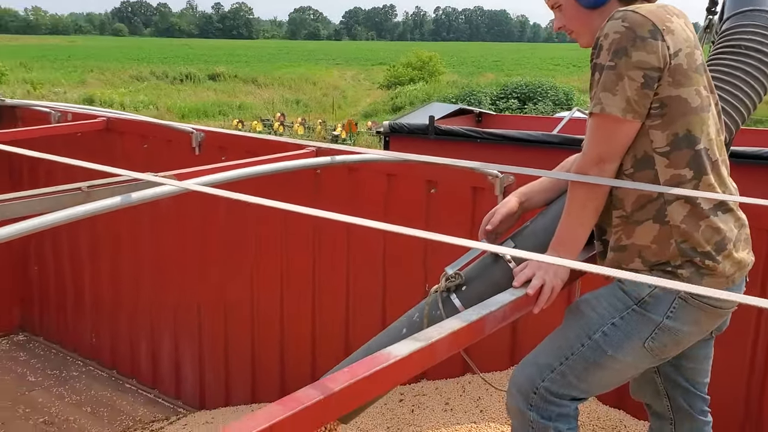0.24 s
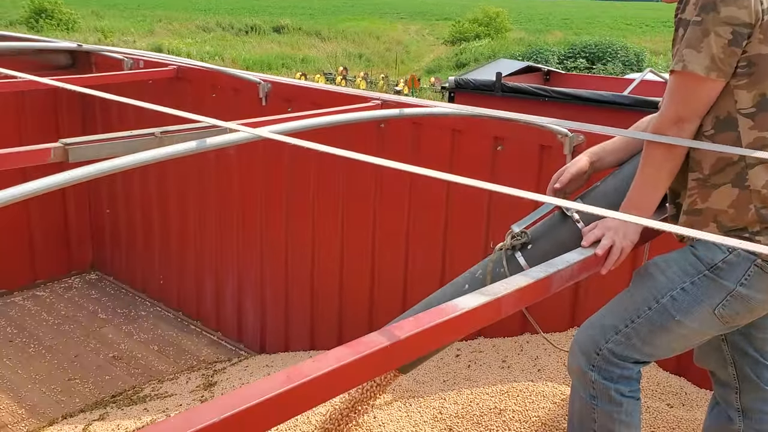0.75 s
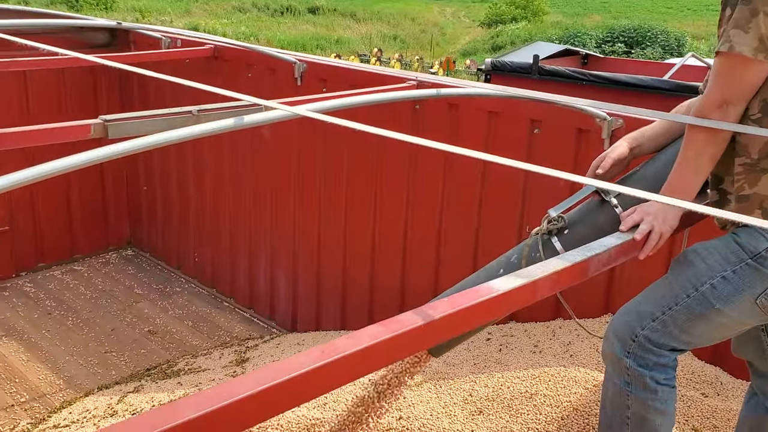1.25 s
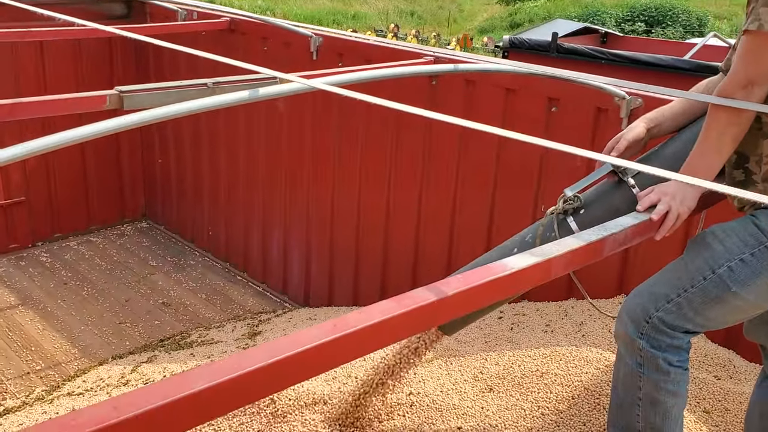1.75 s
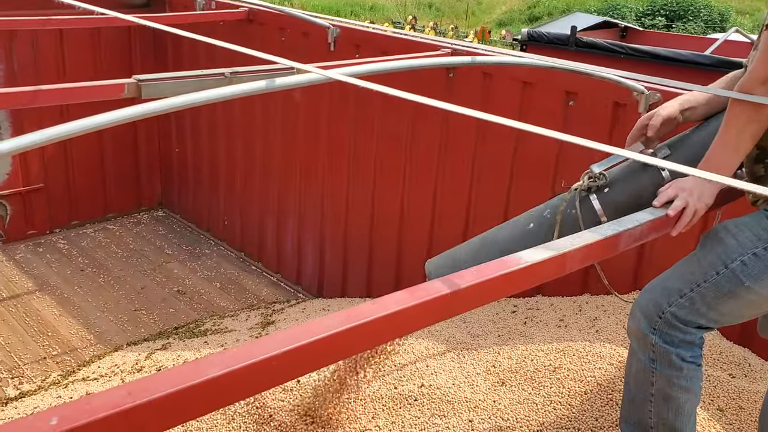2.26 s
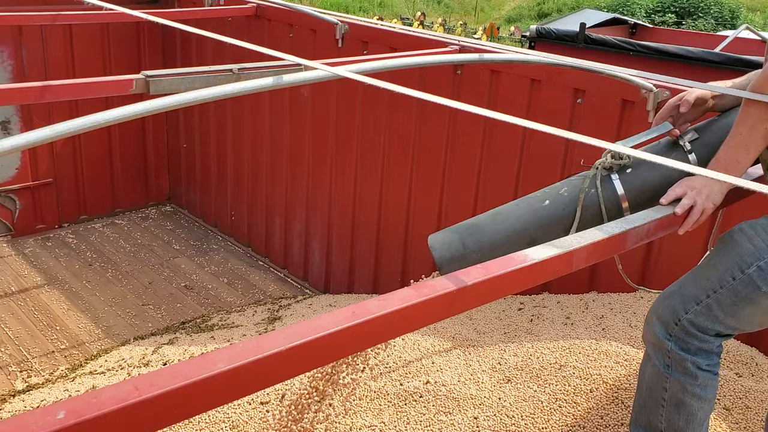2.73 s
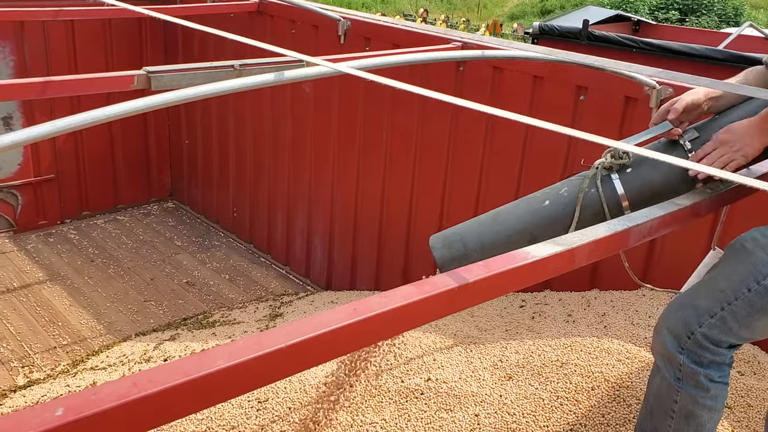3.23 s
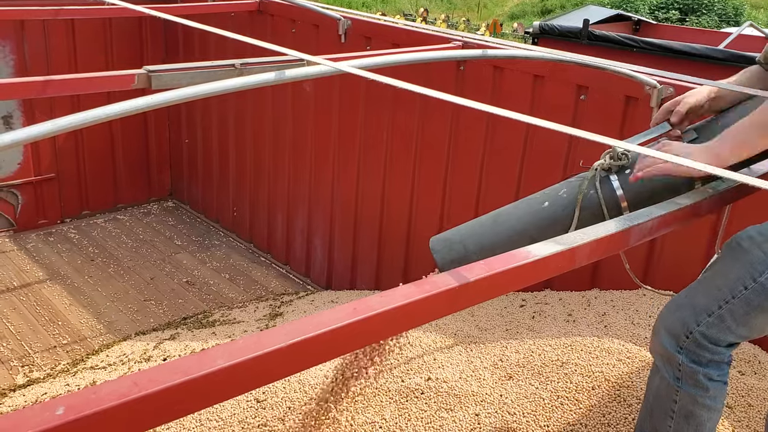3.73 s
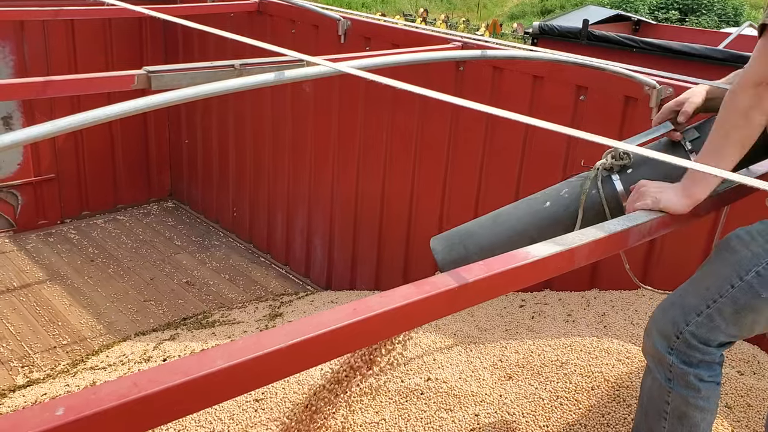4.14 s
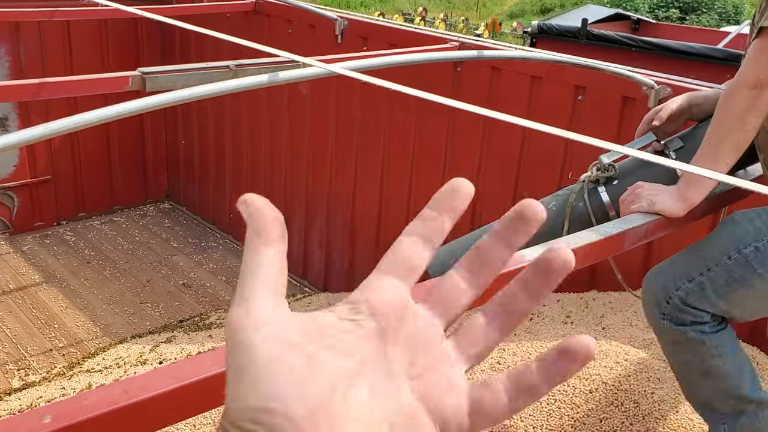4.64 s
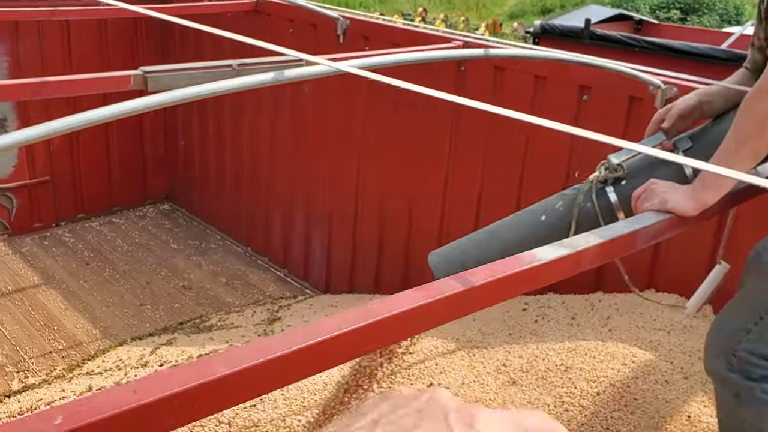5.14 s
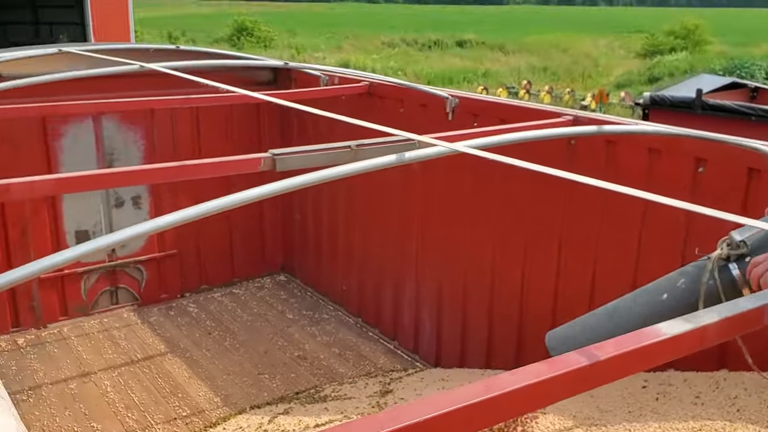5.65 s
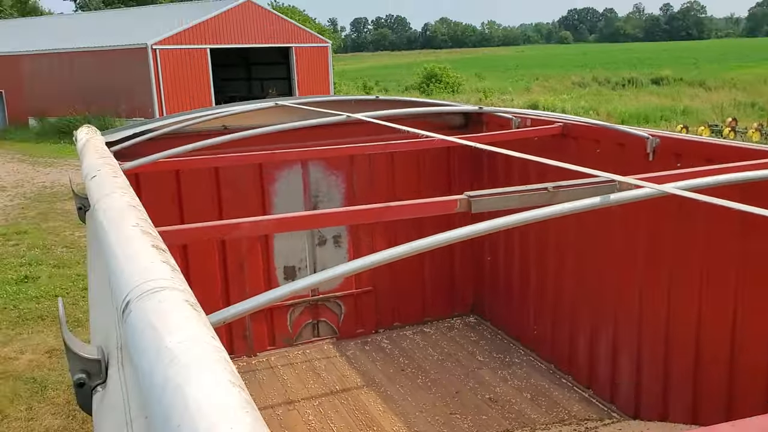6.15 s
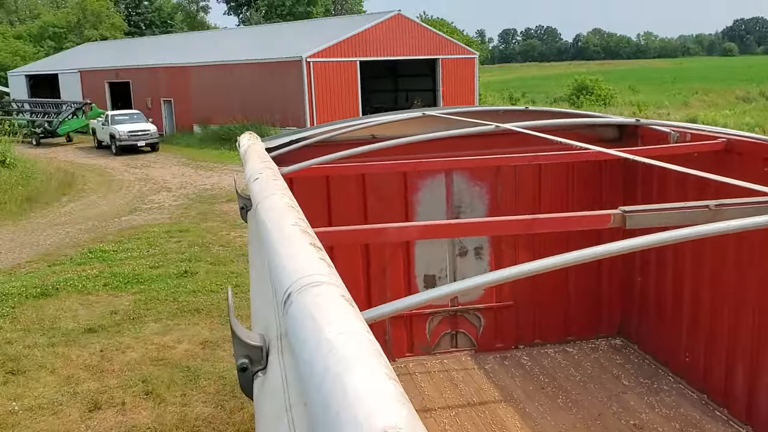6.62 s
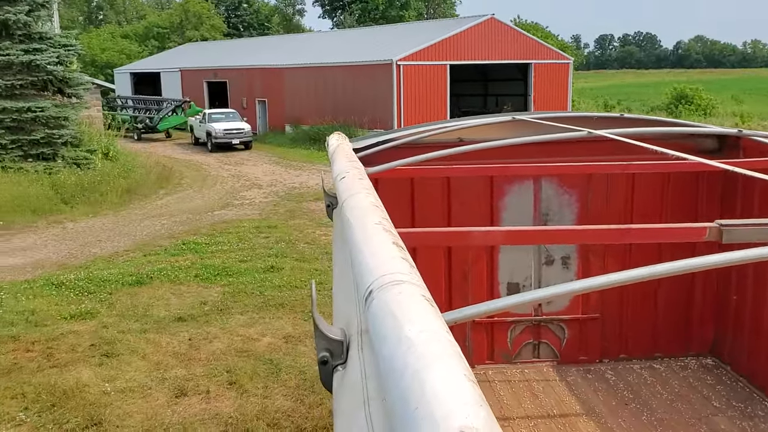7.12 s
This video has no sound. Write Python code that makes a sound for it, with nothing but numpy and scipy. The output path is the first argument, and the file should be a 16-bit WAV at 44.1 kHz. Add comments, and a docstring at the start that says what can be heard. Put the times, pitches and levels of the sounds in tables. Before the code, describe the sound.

A constant rush of peas, bright and dense like heavy sizzling rain, runs throughout over a low, unwavering diesel tone and a faint mechanical hum. The steel wall adds a short close echo. Sharp wind bumps hit the exposed stereo microphone in the first second, occasionally in the middle, and more often after five and a half seconds, when turning away makes the hiss slightly duller and the engine knocks clearer.

```python
"""A dense, hissing rush of dried peas pours down a spout onto the heap in a steel truck box, outdoors.
The rush is thousands of random clicks a second, coloured by the spout and echoed off the steel wall.
A six-cylinder diesel at steady speed drives the auger: tones and short noisy knocks, plus a drive hum.
Gusts of low noise and sharp pressure bumps buffet the microphone, which turns away near the end."""
import sys
import numpy as np
from scipy import signal
from scipy.fft import rfft, irfft, next_fast_len
from scipy.io import wavfile
from scipy.ndimage import uniform_filter1d, map_coordinates

SR = 44100
rng = np.random.default_rng(int(sys.argv[2]) if len(sys.argv) > 2 else 0)


def digitize_waveform(pressure):
    """Quantize a signal to 16-bit integers and store it at the path in sys.argv[1].

    Rows of a 2-D input are taken as channels; values are limited to [-1, 1].
    """
    field = np.atleast_2d(pressure).T
    bounded = np.clip(field, -1, 1)
    quanta = np.round(bounded * 32767).astype(np.int16)
    wavfile.write(sys.argv[1], SR, quanta)


N = 325458  # length in samples


def from_db(db):
    """Turn decibels into a gain."""
    return 10 ** (np.asarray(db) / 20)


def rms_one(x):
    """Scale a sound to an rms of 1."""
    return x / np.sqrt(np.mean(x ** 2) + 1e-20)


def in_time(rows):
    """Read each column of a time table at every sample."""
    s, *columns = np.transpose(rows)
    return [np.interp(np.arange(N) / SR, s, column) for column in columns]


def at_hz(points, hz):
    """Read a frequency table on a logarithmic pitch axis."""
    f, value = np.transpose(points)
    return np.interp(np.log(hz + 1), np.log(f), value)


def shaped(x, gain_at):
    """Filter a sound with a gain given as a function of frequency."""
    size = next_fast_len(N, True)
    hz = np.arange(size // 2 + 1) * SR / size
    return irfft(rfft(x, size) * gain_at(hz), size)[..., :N]


def coloured(x, spectrum):
    """Give a sound the shape of a spectrum, at an rms of 1."""
    return rms_one(shaped(x, lambda hz: from_db(at_hz(spectrum, hz))))


def resonance(hz, centre_hz, width_hz):
    """A resonance peak of height 1."""
    return 1 / (1 + (2 * (hz - centre_hz) / width_hz) ** 2)


def drift(points_per_s):
    """Wander slowly in straight lines between random points of spread 1."""
    points = rng.standard_normal(400)
    return np.interp(np.arange(N) / SR * points_per_s, np.arange(len(points)), points)


def swell(s, width_s):
    """Rise and fall smoothly about a moment, to a height of 1."""
    return np.exp(-np.minimum(((np.arange(N) / SR - s) / width_s) ** 2, 50))


def panned(balance_db):
    """Left and right gains for a left-minus-right level difference."""
    return from_db(np.array([[.5], [-.5]]) * balance_db)


def delayed(x, ms):
    """Read a sound later, by a delay that may move."""
    return map_coordinates(x, [np.arange(N) - ms * SR / 1000], order=3, mode="nearest")


# Steady low rumble of the machinery, shape only: pitch_hz [Hz], density_db [dB per Hz]
RUMBLE_SPECTRUM = [(15, -30), (30, -9), (55, -3.5), (80, 2.5), (130, -9.5), (220, -9), (350, -16),
                   (600, -20), (1500, -57)]


def rumble(level_db=-35.0):
    """Low-pitched noise from the machinery reaches both microphone ports alike."""
    return from_db(level_db) * coloured(rng.standard_normal(N), RUMBLE_SPECTRUM)


# Turbulence in the wind, shape only: pitch_hz [Hz], density_db [dB per Hz]
TURBULENCE = [(15, -40), (30, -19), (50, -1), (80, -1), (130, -5), (220, -15), (350, -23), (600, -33),
              (1500, -48)]
# Gusts: height_s [s], level_db [dB before the wind's overall level], swell_and_fall_s [s]
GUST_TIMES = [(.6, -21, 0.22), (.93, -26, 0.14), (1.9, -31, .1), (2.6, -27.5, 0.25), (3.35, -30, 0.093),
              (4.65, -33, .15), (5.15, -30.5, 0.17), (5.57, -22.5, 0.17), (6.4, -26, 0.22),
              (6.83, -24, 0.23), (7.28, -23, 0.18)]
# Sharp buffets: centre_s [s], peak_db [dB], balance_db [left minus right, dB], length_s [s]
BUFFET_BUMPS = [(0.557, -14, 3, 0.0011), (0.57, -16, 17, 0.0018), (0.749, -10, -15.5, 0.0019),
                (1.877, -15, -5, 0.0027), (4.139, -23, -11, 0.0053), (4.707, -21, -17, 0.0037),
                (5.468, -23, -20, 0.0018), (5.557, -18, -12, 0.004), (5.632, -14, -6, 0.0029),
                (5.798, -16, -10, 0.0025), (6.371, -11, 4, 0.003), (6.661, -18, -12, 0.0018),
                (6.755, -19, 16, 0.0041), (7.245, -20, -16, 0.0018)]
# Turbulence around each buffet: level [dB re its peak, before the wind's overall level], swell and fall [s]
WAKE_DB, WAKE_S = -7.5, .025


def wind(level_db=-2, lumpy_db=1.5, gust_balance_db=1.0):
    """Eddies make separate low noise at each port, swelling with gusts and around each buffet."""
    gusts = sum(from_db(db) * swell(s, width_s) for s, db, width_s in GUST_TIMES)
    gusts = gusts * panned(gust_balance_db)
    wakes = sum(from_db(db + WAKE_DB) * panned(balance_db) * swell(s, WAKE_S)
                for s, db, balance_db, _ in BUFFET_BUMPS)
    lumps = from_db(lumpy_db * np.array([drift(20), drift(20)]))
    eddies = coloured(rng.standard_normal((2, N)), TURBULENCE)
    # even out single eddies, so that the gust sets the strength
    eddies = eddies / np.sqrt(uniform_filter1d(eddies ** 2, size=SR // 16) + 1e-9)
    return from_db(level_db) * np.hypot(gusts * lumps, wakes) * eddies


def buffets():
    """A hard eddy gives one pressure bump with a dip on either side."""
    out = np.zeros((2, N))
    for s, db, balance_db, length_s in BUFFET_BUMPS:
        u = (np.arange(N) / SR - s) / length_s
        bump = (1 - u ** 2) / (1 + u ** 2) ** 2
        out += from_db(db) * panned(balance_db) * bump
    return out


# Tones of the auger drive: pitch_hz [Hz], level_db [dB rms, before waver and balance]
DRIVE_TONES = [(203.2, -31.0), (297.4, -50.5), (595.5, -56.5), (609.7, -58.5)]


def auger_drive(waver_db=1.0, slip_hz=0.29, balance_db=1.5):
    """Turning parts of the drive hum, wavering with the load of grain."""
    # slip_hz is the pitch wander of the first tone; the others wander in proportion
    time = np.arange(N) / SR + np.cumsum(slip_hz * drift(3.14)) / SR / DRIVE_TONES[0][0]
    time = time - np.array([[.2e-3], [0]])  # the left port hears it 0.2 ms later
    hum = np.zeros((2, N))
    for hz, db in DRIVE_TONES:
        hum += from_db(db + waver_db * drift(5.3)) * np.sqrt(2) * np.sin(2 * np.pi * hz * time)
    return hum * panned(balance_db)


FIRING_HZ, CYLINDERS = 85.5, 6  # firings per second of the whole engine
# Strong exhaust lines: multiple [of the four-stroke cycle rate], level_db [dB re the engine level]
EXHAUST_LINES = [(6, -0.5), (12, -21.5), (16, -27), (24, -27), (26, -32.5), (38, -29), (43, -32),
                 (46, -42.5), (48, -30), (64, -39), (74, -29), (87, -35)]


def exhaust(cycles, firing_db, upper_db, flutter_db=2.0):
    """A deep, steady firing tone; unequal cylinders add weaker lines that flutter."""
    left_lag = np.array([[.3e-3], [0]]) * FIRING_HZ / CYLINDERS  # 0.3 ms, counted in cycles
    out = np.zeros((2, N))
    for multiple, db in EXHAUST_LINES:
        order = round(multiple)
        lift_db = 0 if order == CYLINDERS else upper_db + flutter_db * drift(7)
        tone = np.sin(2 * np.pi * (order * (cycles - left_lag) + rng.random()))
        out += from_db(firing_db + db + lift_db) * np.sqrt(2) * tone
    return out


# Ring of the engine block, shape only: pitch_hz [Hz], density_db [dB per Hz]
BLOCK_SPECTRUM = [(100, -17), (260, -10), (600, 3), (800, 3.5), (1200, 3.5), (1700, -1.5), (3000, -37)]


def clatter(cycles, knock_s=0.0065, knock_rough=0.32, cylinder_spread=0.3):
    """Each cylinder has its own knock, ringing the block a little differently every cycle; rms 1."""
    fired = np.flatnonzero(np.diff(np.floor(cycles * CYLINDERS)))
    size = SR // 40
    decay = np.exp(-np.arange(size) / SR / knock_s)
    strength = np.exp(cylinder_spread * np.cos(np.arange(CYLINDERS) * 2))
    knocks = rng.standard_normal((CYLINDERS, 2, size)) * strength[:, None, None]
    out = np.zeros((2, N + size))
    for k, i in enumerate(fired):
        fresh = knock_rough * rng.standard_normal((2, size))
        out[:, i:i + size] += decay * (knocks[k % CYLINDERS] + fresh)
    return coloured(out[:, :N], BLOCK_SPECTRUM)


# Engine level over time; it dips after the big buffet at 0.75 s and recovers by about 2 s:
# time_s [s], level_db [dB, before the line levels and balance]
ENGINE_LEVEL = [(0, -19), (.6, -19), (.85, -21.5), (1.7, -21), (2.3, -19.5), (5.4, -19.5), (6, -20.5),
                (7.38, -20)]
# Bearing of the pour as the microphone turns: time_s [s], left_lag_ms [lag of the left port, ms]
POUR_BEARING = [(0, .21), (1.3, 0.27), (4.3, 0.27), (5.3, 0.23), (5.8, .335), (7.38, 0.37)]
FACING_LAG_MS = .275  # left lag while the microphone faces the spout
# the turn uncovers the upper lines and knocks (dB per ms of extra lag)
UNCOVER_DB_PER_MS = 11


def engine(wander_hz=0.036, block_db=-43.0, block_balance_db=5.0, upper_follows=.6, balance_db=-0.5):
    """Six cylinders fire in turn, driving the exhaust and the block together."""
    firing_db, = in_time(ENGINE_LEVEL)
    lag_ms, = in_time(POUR_BEARING)
    # upper_follows is the share of the engine's level swing that the upper sounds take on
    upper_db = upper_follows * (firing_db - firing_db.mean())
    upper_db = upper_db + UNCOVER_DB_PER_MS * (lag_ms - FACING_LAG_MS)
    cycles = np.cumsum(FIRING_HZ + wander_hz * drift(1.95)) / SR / CYLINDERS
    block = from_db(block_db + upper_db) * clatter(cycles) * panned(block_balance_db)
    return (exhaust(cycles, firing_db, upper_db) + block) * panned(balance_db)


def impacts(per_s, spread_db):
    """Random clicks of uneven strength, one for each bounce of a pea."""
    sizes = from_db(spread_db * np.minimum(rng.exponential(1, N), 4)) * rng.standard_normal(N)
    return rms_one(sizes * (rng.random(N) < per_s / SR))


# Pea impacts on spout and heap, shape only: pitch_hz [Hz], density_db [dB per Hz]
IMPACT_SPECTRUM = [(450, -9), (800, -10.5), (1500, -5.5), (1850, -4.5), (2700, -2), (3300, -5),
                   (4600, -3.5), (5300, -4), (6200, -3), (7800, -7), (9700, -6.5), (11300, -7),
                   (12500, -8.5), (15400, -9.5)]
# Cross resonances of the air in the spout: pitch_hz [Hz], width_hz [Hz], lift_db [dB]
SPOUT_AIR_MODES = [(3100, 130, 1.5), (3880, 110, 3.5), (5660, 210, 1), (9110, 200, 2.5), (11120, 230, 4),
                   (12900, 260, 2), (15250, 250, -5)]


def spout_gain(hz):
    """The broad colour of the impacts, raised or lowered at the resonances of the tube."""
    lift_db = sum(db * resonance(hz, f, width) for f, width, db in SPOUT_AIR_MODES)
    low_cut = hz ** 2 / (hz ** 2 + 100 ** 2)
    return from_db(at_hz(IMPACT_SPECTRUM, hz) + lift_db) * low_cut


# Modes of the tube wall: pitch_hz [Hz], width_hz [Hz], usual_lift_db [dB]
TUBE_WALL_MODES = [(3490, 330, 4), (4350, 270, 4)]
# The stream dwells where the wall favours a mode: height_s [s], swell_and_fall_s [s],
# lower_mode_extra_db [dB], upper_mode_extra_db [dB]
WALL_DWELLS = [(1.25, .4, 2.0, 2), (4.5, .35, 2, 0), (5.25, 0.33, -1.5, 3.5)]
# the modes fade as the microphone turns (dB per ms of lag change) and wander a little (dB)
RING_DB_PER_MS, RING_WANDER_DB = -18, 1


def spout_ring(body, turn_ms):
    """Two modes of the tube wall swell and fade as the stream strikes it at different places."""
    out = body
    for k, (f, width, usual_db) in enumerate(TUBE_WALL_MODES):
        mode = shaped(body, lambda hz: resonance(hz, f, width))
        dwell_db = sum(extra_db[k] * swell(s, width_s) for s, width_s, *extra_db in WALL_DWELLS)
        turn_db = RING_DB_PER_MS * np.abs(turn_ms)
        lift_db = usual_db + dwell_db + turn_db + RING_WANDER_DB * drift(3.02)
        out = out + (from_db(lift_db) - 1) * mode
    return out


# Level of the pour over time; it dips along with the engine from 0.8 to 1.8 s, and again near the end:
# time_s [s], level_db [dB, before added layers and balance]
POUR_LEVEL = [(0, -24.5), (.55, -25), (.78, -27), (1.8, -26), (2.2, -23.5), (3.2, -25), (4.3, -24.5),
              (5.4, -25), (6.1, -26.5), (6.75, -27.5), (7.1, -26)]
# Colour of the right microphone port: pitch_hz [Hz], level_db [dB re the left port]
RIGHT_PORT = [(500, -11.5), (900, -1.4), (1450, 3), (1900, -0.5), (2500, -2), (4300, -3.5), (5200, -6.5),
              (6800, -2.5), (7900, -3.7), (8500, 6.4), (9100, 10.5), (10300, 6), (13000, 4), (15400, 3)]
# How alike the pour is at both ports: pitch_hz [Hz], likeness [0 to 1]
PORT_LIKENESS = [(200, 1), (550, 0.63), (1000, 0.51), (1900, 0.43), (3500, 0.075), (8000, 0.041),
                 (15000, .05)]
# Echo from the spout rim: pitch_hz [Hz], strength [share of the rush]
RIM_ECHO_STRENGTH = [(400, 0.16), (1900, 0.15), (4500, 0.088), (7500, 0.022)]
USUAL_POUR_DB = -25.5
# level of the fizz on the heap and of the hollow rush of the tube (dB), and the
# share of the stream's level swing that the hollow rush follows
FIZZ_DB, HOLLOW_DB, HOLLOW_FOLLOWS = -1.83, -1.5, 0.66
# the spout is held steeply at the start: extra hollow level (dB), time in which it is lifted (s)
STEEP_DB, LIFT_S = 1.5, 1.4
# echo delays while facing the spout (ms); the wall delay is the left port's
WALL_ECHO_MS, RIM_ECHO_MS = 3.15, 0.73
# change of wall echo (ms) and left-right balance (dB) per ms of extra lag
WALL_MS_PER_MS, BALANCE_DB_PER_MS = 9.0, -9
# a lower band grows as the microphone turns: centre (Hz), width (Hz), lift (dB per ms of lag change)
TURNED_HZ, TURNED_WIDTH_HZ, TURNED_DB_PER_MS = 2880, 640, 16


def peas(bounces_per_s=40000, spread_db=0.3, clump_db=0.47, wall_echo=0.12, balance_db=0.88):
    """Thousands of bounces a second merge into a rush that rings in the spout and echoes off the wall."""
    pour_db, = in_time(POUR_LEVEL)
    lag_ms, = in_time(POUR_BEARING)
    swing_db = pour_db - USUAL_POUR_DB
    turn_ms = lag_ms - FACING_LAG_MS
    direct, left, right = [impacts(bounces_per_s, spread_db) for _ in range(3)]
    alike = lambda hz: np.clip(at_hz(PORT_LIKENESS, hz), 0, 1)
    # direct sound reaches the right port first; sound scattered in the box differs at each port
    rush = shaped(np.array([delayed(direct, lag_ms), direct]), lambda hz: np.sqrt(alike(hz)))
    rush += shaped(np.array([left, right]), lambda hz: np.sqrt(1 - alike(hz)))
    echo_ms = WALL_ECHO_MS + WALL_MS_PER_MS * turn_ms
    rush += wall_echo * np.array([delayed(rush[0], echo_ms), delayed(rush[1], echo_ms * .7)])
    # the rim of the spout bends round an inverted copy
    rim = np.array([delayed(side, RIM_ECHO_MS) for side in rush])
    rush -= shaped(rim, lambda hz: at_hz(RIM_ECHO_STRENGTH, hz))
    port_gain = lambda hz: from_db(np.array([[0], [1]]) * at_hz(RIGHT_PORT, hz))
    rush = shaped(rush, lambda hz: spout_gain(hz) * port_gain(hz))
    # split into treble, bass and middle; the hollow bass swings less than the stream itself
    fizz = shaped(rush, lambda hz: 1 / (1 + (7500 / (hz + 1)) ** 8))
    hollow = shaped(rush, lambda hz: 1 / (1 + (hz / 2300) ** 8))
    body = rush - fizz - hollow
    hollow_db = HOLLOW_DB + (HOLLOW_FOLLOWS - 1) * swing_db + STEEP_DB * swell(0, LIFT_S)
    rush = spout_ring(body, turn_ms) + from_db(FIZZ_DB) * fizz + from_db(hollow_db) * hollow
    rush = rush / np.std(body)
    # off the axis of the spout a lower band stands out
    band = shaped(rush, lambda hz: resonance(hz, TURNED_HZ, TURNED_WIDTH_HZ))
    rush = rush + (from_db(TURNED_DB_PER_MS * np.abs(turn_ms)) - 1) * band
    # the grain comes in slightly uneven clumps
    level = from_db(pour_db + clump_db * drift(25))
    return rush * level * panned(balance_db + BALANCE_DB_PER_MS * turn_ms)


def scene():
    """Add up wind, machine and pour."""
    return rumble() + wind() + buffets() + auger_drive() + engine() + peas()


def record(dry, low_cut_hz=29, top_cut_hz=15750):
    """Cut the deepest rumble, round off the loudest peaks, then cut the top."""
    sound = signal.sosfilt(signal.butter(2, low_cut_hz, "high", fs=SR, output="sos"), dry)
    sound = sound / (1 + (sound / .95) ** 8) ** (1 / 8)
    return shaped(sound, lambda hz: np.clip((top_cut_hz - hz) / 100 + .5, 0, 1))


dry = scene()
out = record(dry)
digitize_waveform(out)
```